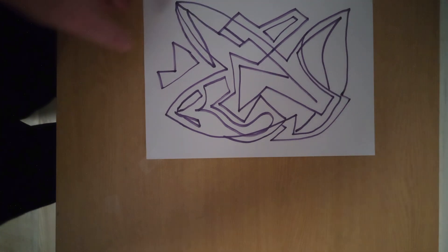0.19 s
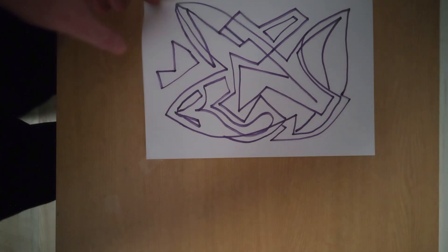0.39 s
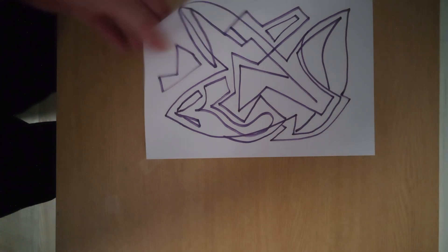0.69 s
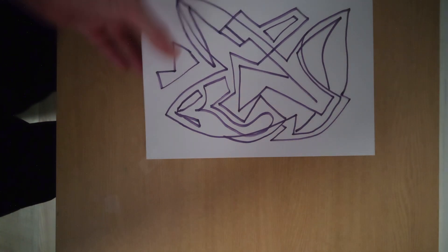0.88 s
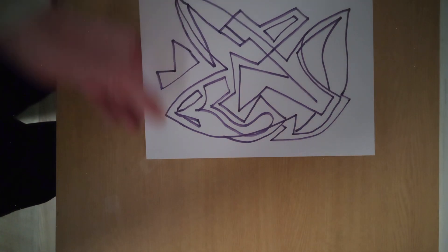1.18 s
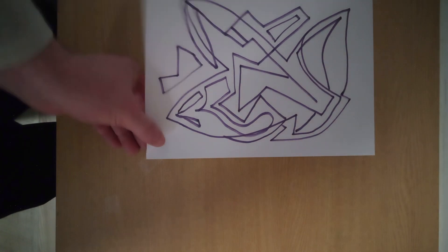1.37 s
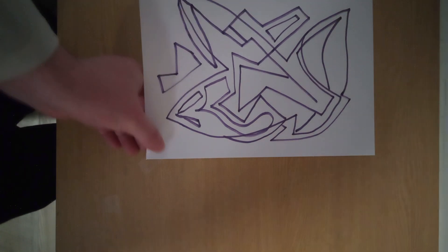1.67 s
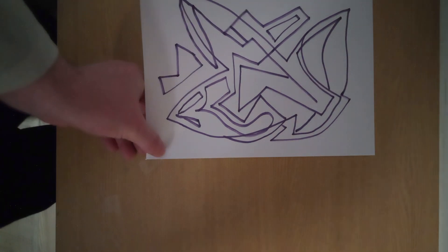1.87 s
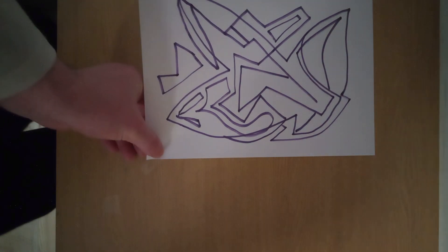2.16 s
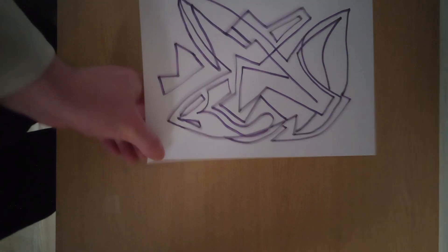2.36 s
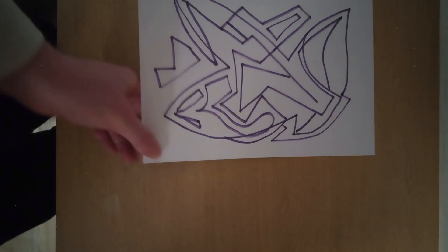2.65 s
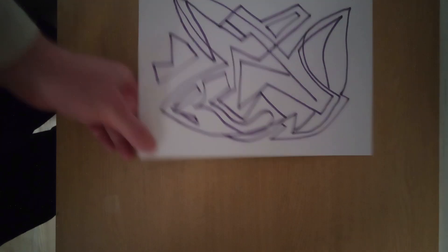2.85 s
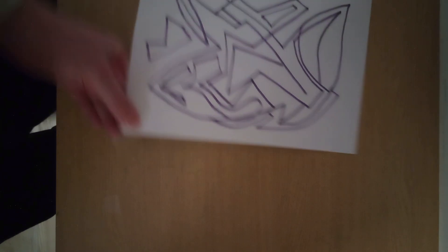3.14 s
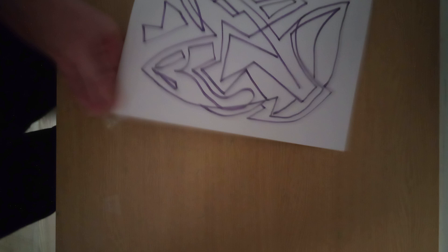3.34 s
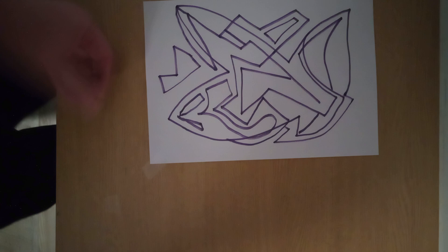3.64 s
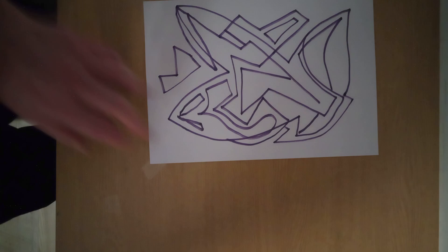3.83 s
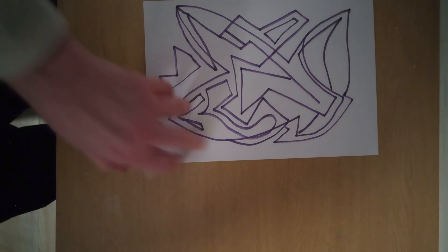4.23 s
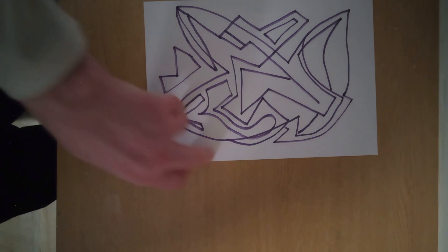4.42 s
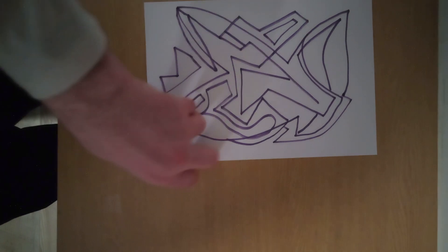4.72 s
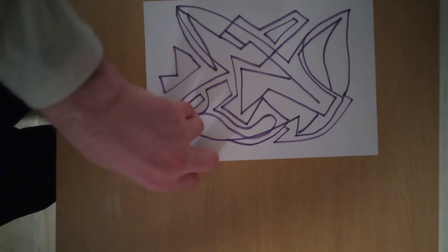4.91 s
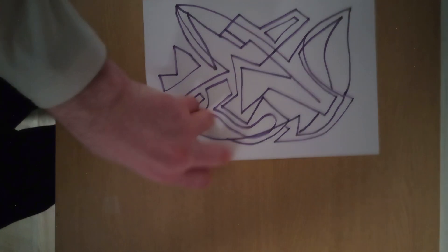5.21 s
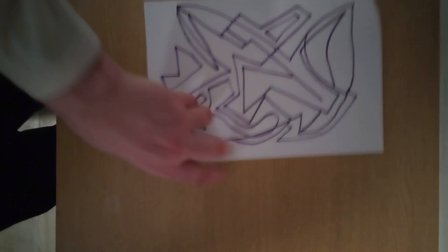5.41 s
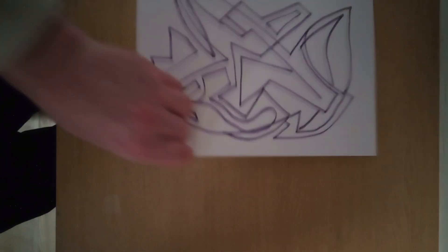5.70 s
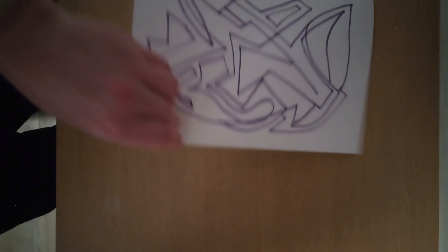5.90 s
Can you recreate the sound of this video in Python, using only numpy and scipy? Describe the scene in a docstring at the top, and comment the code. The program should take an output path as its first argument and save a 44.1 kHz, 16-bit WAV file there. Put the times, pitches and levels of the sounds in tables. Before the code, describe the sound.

Close to the microphone in a quiet room, a sheet of paper is handled on a wooden desktop. Brief swishes and crinkles come in clusters, mixed with light fingertip taps. The rustling then thins out, leaving a few dull, soft bumps, before a crisp paper snap, the loudest sound, leads into a last scrape and flex. A faint low hum and a little hiss lie underneath.

```python
"""Paper handled on a wooden desk

One microphone close to a desk in a quiet room. A hand grips, flexes and slides a sheet of paper:
slipping fibres rub in bursts and creases snap, ringing differently in each shape the sheet is held in.
Fingertips knock the desk top, and low thuds come through the furniture.
A wavering hum and microphone hiss lie below."""
import sys
import numpy as np
from scipy import signal
from scipy.fft import rfft, irfft, next_fast_len
from scipy.io import wavfile
from scipy.ndimage import uniform_filter1d

SR = 44100
rng = np.random.default_rng(int(sys.argv[2]) if len(sys.argv) > 2 else 0)


def wav_record(signal):
    """Record a signal, one row per channel, as 16-bit PCM in the file named by sys.argv[1]."""
    frames = np.transpose(np.atleast_2d(signal))
    bounded = np.clip(frames, -1, 1)
    # unit amplitude maps onto the largest positive 16-bit level
    quanta = np.round(bounded * 32767).astype(np.int16)
    wavfile.write(sys.argv[1], SR, quanta)


N = 266452


def rubbing():
    """Sliding fibres sound in five bands, which share each stroke and partly flutter together."""
    # strokes: peak_s, attack_s, hiss_db, base_fade_db_per_s, length_s,
    # then relative to the hiss: flat_db, bend_db, fizz_db, sizzle_db
    strokes = [ (0.004, 0.03, -68, 119, 0.099, -28, -1, -25, -30),
               (0.13, .025, -75.5, 350, .04, -29, -20, -40, -35),
               (0.23, 0.11, -73.5, 230, 0.085, -14, -23, -21, -18),
               (0.309, 0.0044, -47, 800, 0.027, -21.5, -22, -38, -40),
               (0.34, .02, -65.5, 154, 0.069, -20, -25, -33, -40),
               (0.475, 0.046, -69.5, 20, 0.024, -5, -12, -30, -27),
               (0.507, 0.054, -54, 652, 0.023, -17, -9, -22, -34),
               (0.591, 0.045, -58, 300, 0.037, -21, 2.5, -20, -27),
               (0.703, 0.28, -61, 58, 0.034, -15, -8, -19, -18),
               (0.747, 0.011, -55.5, 175, 0.12, 1, 4.5, -16, -18),
               (0.891, .012, -58.5, 102, .01, -18.5, -3.5, -22, -23),
               (0.916, 0.037, -55, 700, .015, -12.5, -10.5, -23, -14),
               (0.944, 0.04, -48.5, 130, 0.11, 11, 8, -35.5, -33),
               (1.064, .006, -49, 100, 0.015, -24, -6, -24, -30),
               (1.091, .03, -49.5, 160, .15, 3, -2.5, -29.5, -41),
               (1.26, 0.065, -70.5, 38, 0.18, -22, -2.5, -17, -20),
               (1.52, 0.16, -51.5, 192, 0.012, -27, -17, -20, -26),
               (1.545, 0.01, -48.5, 264, 0.15, -7, -14, -26, -9),
               (1.751, 0.033, -72, 11, 0.097, -5.5, -2, -22, -23),
               (1.869, 0.08, -69.5, 152, 0.083, 1, 2, -19, -28),
               (1.994, 0.12, -60, 248, .03, -18, -12, -19.5, -31),
               (2.04, .008, -70.5, 300, 0.02, 5.5, -6, -20, -31),
               (2.072, 0.0066, -59, 241, 0.057, 1.5, 1.5, -27, -24),
               (2.137, 0.031, -77, 200, 0.028, -2, 8, -8, -5),
               (2.196, 0.03, -76.5, 200, 0.019, -4, 0, -2, -1),
               (2.303, 0.0097, -36, 120, 0.017, -27, -11.5, -7, -8),
               (2.333, 0.0081, -48, 62, 0.018, -26, -15, -3, -6),
               (2.354, 0.0094, -36, 257, 0.092, -18.5, -12.5, -18.5, -20),
               (2.447, 0.045, -61, 93, 0.074, -28.5, -9.5, -28.5, -40),
               (2.523, .004, -63.5, 150, 0.016, -26.5, -9.5, -7, -3),
               (2.545, 0.011, -45, 5, 0.033, -15.5, -6, -30, -32),
               (2.587, 0.021, -31.5, 450, 0.039, -3, -3.5, -17, -23),
               (2.638, 0.069, -44.5, 193, 0.16, -7.5, -0.5, -28, -44),
               (2.876, 0.087, -61, 297, 0.083, -14, -14, -33, -40),
               (2.981, 0.09, -76, 95, .01, -1, -10, -15, -12),
               (3.134, 0.014, -43.5, 752, 0.036, -22, -13.5, -19, -5),
               (3.168, 0.023, -71, 113, 0.26, -19, -9, -12, -16),
               (3.432, 0.014, -40.5, 620, .055, -21.5, -7.5, -28.5, -32.5),
               (3.509, 0.042, -59.5, 650, 0.031, -21, -2, -20, -28),
               (3.523, .02, -67.5, 44.5, .14, -23, -9, -30, -25),
               (3.793, .06, -84, 37, 0.055, 5, 0, -25, -18), (4.252, .08, -89, 14, 0.44, 0, 2, -23.5, -17),
               (4.325, .13, -74, 500, 0.033, -22, -17, -21.5, -18),
               (4.391, 0.1, -79, 70, 0.12, -10, -11, -25, -15),
               (5.105, .012, -47, 5, 0.018, -51, -33, -18.5, -33),
               (5.139, 0.027, -56, 152, 0.091, -17.5, -13, -18.5, -22),
               (5.292, 0.086, -61, -3, 0.18, -18.5, -13, -17, -22),
               (5.348, .008, -56, 304, 0.012, -30, -6, -19, -18),
               (5.476, 0.0058, -23.5, 440, 0.043, -12.5, -6, -22.5, -28),
               (5.51, 0.025, -34, 181, 0.08, -13, -8.5, -24.5, -40),
               (5.572, 0.13, -43, 63, 0.16, -26, -3, -50, -54),
               (5.751, .04, -59, 280.5, 0.07, -8, 2, -40, -40),
               (5.704, .02, -63, 202, .015, -17, -12, -16, -25),
               (5.859, 0.02, -77.5, 40, 0.056, 31, 23.5, -39, -36),
               (5.918, 0.07, -79.5, 201, 0.049, 38.5, 27, -43, -38),
               (5.976, 0.057, -88.5, 57.5, .1, 36, 24.5, -28.5, -24)]
    # fading speed of hiss, flat, bend, fizz and sizzle: multiple of the base fade
    fade_shares = [0.96, 0.99, 0.75, 1.2, 1.3]
    # band spectra: frequency_hz, density_db
    edge_hiss = [(2500, -28), (3600, -2), (4500, 3), (6000, 3), (7200, 0), (8000, -44)]
    flat_of_sheet = [(250, -23.5), (600, 0), (900, 1), (1300, 10), (1700, 8), (2300, -54)]
    bend = [(1200, -10.5), (1800, 2.5), (2500, 1.5), (3000, 3.5), (3600, 1.5), (4500, -42.5)]
    fibre_fizz = [(6500, -34), (7500, 3), (8200, -1.5), (9100, -1), (10500, -8), (12200, -15), (13000, -39)]
    top_sizzle = [(11500, -32.5), (13000, -13.5), (14300, -1.5), (15300, 5), (17000, -16.5)]
    rise_db = 28.5   # climb during the attack
    cutoff_db_per_s = 898   # the rubbing's tail is cut off abruptly, as by a noise gate
    gains, t = np.zeros((5, N)), np.arange(-SR // 2, SR // 2) / SR
    for peak_s, attack_s, hiss_db, base_fade, length_s, *relative_db in strokes:
        attack_db = rise_db * np.minimum(t, 0) / max(attack_s, .002)
        cutoff_db = cutoff_db_per_s * np.maximum(t - length_s, 0)
        fade_db = max(base_fade, 0) * np.maximum(t, 0)
        for gain, band_db, share in zip(gains, [0] + relative_db, fade_shares):
            add(gain, peak_s + t[0], amp(hiss_db + band_db + attack_db - cutoff_db - share * fade_db))
    gains = uniform_filter1d(gains, size=130, axis=1)
    pressure_db = 0.85 * drift(rate_hz=50)
    bands = [colour(fibre_slips(per_s=9000, spread_db=0.5), spectrum) * amp(pressure_db + drift(27))
             for spectrum in (edge_hiss, flat_of_sheet, bend, fibre_fizz, top_sizzle)]
    return gains * bands


def fibre_slips(per_s, spread_db):
    """Fibres catch and slip: random clicks of uneven size."""
    sizes = amp(spread_db * np.minimum(rng.exponential(1, N), 4)) * rng.choice([-1, 1], N)
    return sizes * (rng.random(N) < per_s / SR)


def crease_snaps():
    """Each crease gives a cluster of slips around its own pitch, swelling briefly and dying fast."""
    # creases: time_s, level_db, pitch_hz, swell_s, t60_s, relative_fizz_db
    snaps = [(0.308, -37.5, 4440, 0.002, 0.068, -34), (0.4966, -35.5, 2900, 0.0014, 0.11, -38),
             (0.5751, -41, 2540, 0.0016, 0.13, -28), (0.746, -28, 2003, 0.0016, 0.056, -37),
             (0.8964, -40.5, 5890, 0.0032, 0.06, -21.5), (0.9087, -30, 5450, 0.0014, 0.058, -36.5),
             (0.9406, -18.5, 1340, 0.0025, 0.19, -46.5), (0.9586, -18, 1346, 0.0023, 0.12, -55),
             (1.091, -28, 1181, 0.0048, 0.15, -53), (1.546, -29.5, 6050, 0.002, 0.052, -10.5),
             (2.0473, -51, 1400, 0.0018, 0.066, -43), (2.0732, -43.5, 1320, 0.002, 0.032, -40),
             (2.2996, -53, 5160, 0.0022, 0.041, -4), (2.318, -34, 4990, 0.0013, 0.15, -18),
             (2.3507, -33.5, 5200, 0.0015, 0.067, -20), (2.524, -34, 3700, 0.0034, 0.092, -36),
             (2.544, -36, 5860, 0.0024, 0.033, -34), (2.5829, -15, 1864, 0.0012, 0.041, -34),
             (3.1358, -38, 4900, 0.0014, 0.049, -2), (3.4285, -56, 4080, 0.0024, 0.055, -21),
             (3.504, -41, 3680, 0.0028, 0.079, -20), (5.105, -51.5, 4400, 0.003, 0.037, -19),
             (5.3, -52, 1660, 0.002, 0.077, -40), (5.3487, -35.5, 2430, 0.0024, 0.054, -24),
             (5.4786, 2, 3380, 0.0026, 0.033, -44), (5.8536, -34.5, 950, 0.0038, 0.36, -47.5)]
    out, t = np.zeros(N), np.arange(SR // 4) / SR
    for time_s, level_db, hz, swell_s, t60_s, fizz_db in snaps:
        slips = rng.standard_normal(len(t))
        slips *= amp(1.1 * rng.standard_normal(len(t) // 40 + 1).repeat(40)[:len(t)])
        body = rms_one(resonate(resonate(slips, hz, 0.23 * hz), hz, 1.3 * hz))
        body = highpass(body, 0.33 * hz)   # thin paper radiates no bass
        low_fizz = resonate(resonate(slips, 10000, 1500), 11000, 6000)
        high_fizz = resonate(resonate(slips, 14000, 1500), 15200, 2500)
        fizz = amp(fizz_db) * rms_one(low_fizz + .9 * high_fizz)
        envelope = (1 - np.exp(-t / swell_s)) ** 2 * amp(-60 * t / t60_s)
        add(out, time_s - .003, amp(level_db - 10) * envelope * (body + fizz))
    return out


def sheet_modes(excitation):
    """Each movement sounds through the resonances of the sheet's shape, at unchanged energy."""
    # sheet resonances, one list for each shape: pitch_hz, width_hz, lift_db
    shapes = [
        [(4130, 200, 7), (4400, 98, 13), (5800, 120, 10)],
        [(4470, 130, 18), (4930, 100, 12), (5980, 390, 16.5), (6400, 180, 2)],
        [(2960, 480, 9.5), (4700, 90, 6), (6160, 370, 9.5)],
        [(1715, 27, 16), (2750, 300, -3), (3530, 100, 5), (4700, 86, -10), (6650, 180, 7.5)],
        [(1765, 170, 7), (2120, 100, -1), (2570, 100, 7), (4270, 100, 7.5), (6100, 200, 4.5)],
        [(1244, 26.7, -2), (1251, 17, 7), (1577, 60, 2.5), (1904, 80, 11), (2460, 90, 9.5), (4160, 250, 10),
         (6100, 490, 10.5)],
        [(1400, 67, -7), (4450, 86, 6.5), (5350, 38, 12.5), (6250, 83, 5), (6120, 70, 14.5)],
        [(940, 59, 10.5), (1315, 28, 14), (1920, 56, 13.5), (3530, 100, 5), (4230, 50, 13), (5830, 52, 13)],
        [(850, 150, 16.5), (1380, 49, 8), (3360, 100, -1), (4150, 91, 13), (5940, 120, 12), (6150, 86, 7)],
        [(862, 62, 24.5), (3372, 600, 15), (5070, 530, 14.5), (5810, 260, 5.5), (6450, 510, 7)],
        [(3725, 440, 9.5), (5860, 400, 7.5)],
        [(865, 160, 12.5), (1896, 80, 8), (2620, 190, 7), (3850, 410, 10), (4650, 150, -1), (6350, 380, 5.5)],
        [(2700, 68, 6), (2980, 56, 18), (3630, 100, 11), (4820, 120, 10.5), (5330, 100, -5), (6500, 120, -3)],
        [(1590, 280, 18), (3830, 530, 13.5), (4830, 170, 11), (6580, 620, 10)],
        [(586, 18, 21.5), (958, 41, 20), (3990, 270, 14.5), (4310, 250, 15.5), (5960, 290, 11),
         (6420, 190, 14.5)],
        [(1940, 280, 14), (4500, 400, 1)],
        [(1690, 130, 6), (2420, 100, 7), (2746, 94, 16), (4380, 200, 1), (5560, 400, 1.5)],
        [(2030, 320, 7.5), (2700, 73, 8.5), (3036, 190, 15.5), (3580, 83, 12.5), (3980, 200, 12),
         (5370, 270, 7)],
        [(907, 130, 7), (1520, 730, -4.5), (2170, 520, 15.5), (4180, 220, 23.5)],
    ]
    # the grip changes and the sheet takes its next shape: start_s
    regrips = [0.3, 0.465, 0.56, 0.74, 0.885, 1.295, 1.735, 2.035, 2.29, 2.515, 2.57, 2.825, 3.12, 3.41,
               4.145, 5.095, 5.47, 5.84]
    thin_gain_db, thin_width_hz = 11.5, 16
    out = np.zeros(N)
    starts = [round(s * SR) for s in regrips]
    for start, end, modes in zip([0] + starts, starts + [N], shapes):
        piece = np.append(excitation[start:end], np.zeros(SR // 10))
        rung = piece + sum((amp(lift_db) - 1) * resonate(piece, hz, width) for hz, width, lift_db in modes)
        # many thin modes, placed by chance, swell and fade as the paper bends
        t = np.arange(len(piece)) / SR
        for place, rate, phase in rng.random((40, 3)):
            awake = np.maximum(np.sin(2 * np.pi * ((1.4 + 7.5 * rate) * t + phase)), 0)
            rung += amp(thin_gain_db) * resonate(piece * awake, 700 + 9000 * place, thin_width_hz)
        same_energy = np.sqrt(np.sum(piece ** 2) / (np.sum(rung ** 2) + 1e-20))
        add(out, start / SR, same_energy * rung)
    return out


def desk_drag(flat):
    """The flat of the sheet drags on the desk top and wakes its low modes."""
    return amp(6.5) * sum(resonate(flat, hz, width_hz=40) for hz in (263.6, 346, 370, 538))


def fingertip_knocks():
    """A fingertip strikes each desk mode with its own strength; a resting hand shortens the ring."""
    # fingertips on the desk top: start_s, level_db, share_of_free_ring, hardness_db_per_octave
    knocks = [(0.748, -39.5, 0.32, -11.5), (0.923, -38.5, 0.47, 10), (0.937, -29, 0.29, -1),
              (1.118, -45.5, 0.43, -3.5), (1.546, -43, 0.36, -0.5), (2.044, -49.5, 0.48, 4),
              (2.075, -39, 0.22, 0), (2.111, -48, 0.14, -1), (2.165, -64, 0.16, -13),
              (2.305, -43, 0.37, 2.5), (2.354, -52, 0.51, -5), (2.547, -44.5, 0.66, 1),
              (2.588, -42.5, 0.65, -6), (3.134, -63, .3, -8), (3.509, -60, 0.24, 1), (5.479, -43, 0.3, -9),
              (5.952, -38, 0.23, 0)]
    # modes of the desk top: pitch_hz, level_db, free_t60_s
    desk_modes = [(200, -6.5, 0.1), (498.4, -1.5, 0.68), (520.7, 0.5, 0.43), (802, -3.5, 0.33),
                  (955, -10.5, 1), (1143, -20.5, 0.067), (1311, -13, 0.67), (2065, -18.5, 0.17)]
    out, t = np.zeros(N), np.arange(SR // 2) / SR
    for start_s, level_db, ring_share, hardness in knocks:
        ring = np.zeros(len(t))
        for hz, mode_db, t60_s in desk_modes:
            strike_db = mode_db + rng.normal(0, 3.8) + hardness * np.log2(hz / 510)
            ring += amp(strike_db - 60 * t / (t60_s * ring_share)) * np.sin(2 * np.pi * hz * t)
        add(out, start_s, amp(level_db - 7) * (1 - np.exp(-t / 0.0039)) * ring)
    return out


def furniture_thuds():
    """A soft push swells and fades within a few cycles; the furniture rumbles on unevenly."""
    # low thuds: time_s, level_db, pitch_hz, swell_s, relative_rumble_db
    thuds = [(0.185, -64.5, 98, 0.014, -15), (0.477, -43, 96, 0.013, -13), (0.569, -57.5, 96, 0.022, -20),
             (0.742, -44.5, 102, 0.01, -17), (0.923, -44, 103.6, 0.0086, -23),
             (2.546, -62, 114, 0.0075, 1.5), (2.669, -62, 112, .012, 3.5), (3.149, -71.5, 114, 0.012, -11),
             (3.628, -44, 100, 0.011, -14.5), (4.322, -45, 101, 0.011, -14.5),
             (4.511, -48, 106, 0.011, -6.5), (4.739, -57.5, 99.4, 0.01, -17),
             (4.931, -61.5, 100, 0.01, -17.5), (5.023, -48, 102.7, 0.0089, -7.5),
             (5.212, -49, 113.5, 0.013, -12), (5.505, -52.5, 112, 0.012, -32),
             (5.877, -48, 108.8, 0.014, -11.5)]
    out, t = np.zeros(N), np.arange(SR // 2) / SR
    for time_s, level_db, hz, swell_s, rumble_db in thuds:
        rise = t / swell_s
        push = (rise / 2) ** 2 * np.exp(2 - rise) * np.sin(2 * np.pi * hz * t)
        noise = rms_one(resonate(resonate(rng.standard_normal(len(t)), 105, 30), 130, 40))
        rumble = amp(rumble_db - 60 * t / 0.65) * noise * (1 - np.exp(-t / 0.0071))
        add(out, time_s - .012, amp(level_db) * (push + rumble))
    return out


def room_reflections(x, t60_s=0.56, level_db=-11.5):
    """The room returns a diffuse, dying tail, duller than the direct sound."""
    t = np.arange(SR // 2) / SR
    tail = rng.standard_normal(len(t)) * amp(-60 * t / t60_s) * (t > .004)
    tail = signal.lfilter([.6], [1, -.4], tail)
    return amp(level_db) * signal.fftconvolve(x, tail / np.sqrt(np.sum(tail ** 2)))[:N]


def hum(base_db=-76.5, waver_db=3.5):
    """Noise in a few narrow resonances makes a low hum that wavers and briefly swells."""
    # hum resonances: pitch_hz, width_hz, relative_db
    resonances = [(207.1, 8.3, -2.5), (231, 42, -10), (99.8, 19, -14.5), (346.5, 52, -13.5)]
    # swells of the hum: centre_s, level_db
    swells = [(0.52, -63), (0.76, -61.5), (1.05, -65), (1.55, -76), (1.83, -68.5), (2.07, -78), (2.62, -56),
              (3.46, -64.5), (3.68, -72), (3.88, -61), (4.07, -72), (4.63, -64), (4.881, -66),
              (5.298, -62.5), (5.42, -61), (5.52, -59.5), (5.61, -64), (5.75, -68), (5.96, -68.5)]
    slope_db_per_s, half_hold_s = 350, 0.021
    t = np.arange(N) / SR
    drone = sum(amp(db) * rms_one(resonate(resonate(rng.standard_normal(N), hz, width), hz, width))
                for hz, width, db in resonances)
    waver = amp(base_db + waver_db * drift(rate_hz=3.6))
    swelling = sum(amp(db - slope_db_per_s * np.maximum(np.abs(t - centre_s) - half_hold_s, 0))
                   for centre_s, db in swells)
    return (waver + swelling) * drone


def noise_floor(level_db=-71):
    """Steady room tone and microphone hiss."""
    # room and microphone noise: frequency_hz, density_db
    spectrum = [(15, -80), (25, -54.5), (80, -22.5), (170, -15.5), (212, -6.5), (317, -27.5), (373, -20),
                (489, -18.5), (754, -27.5), (1260, -29), (5880, -34), (7000, -36), (8360, -52),
                (13000, -49.5), (15000, -41), (17000, -29.5)]
    return amp(level_db) * colour(rng.standard_normal(N), spectrum)


def amp(db):
    """dB to gain."""
    return 10 ** (np.asarray(db) / 20)


def rms_one(x):
    """Scale to rms 1."""
    return x / np.sqrt(np.mean(x ** 2) + 1e-20)


def colour(x, spectrum):
    """Shape by a spectrum drawn on a log-frequency axis; rms 1."""
    hz, db = np.transpose(spectrum)
    size = next_fast_len(N)
    grid_hz = np.maximum(np.fft.rfftfreq(size, 1 / SR), 1)
    gain = amp(np.interp(np.log(grid_hz), np.log(hz), db))
    return rms_one(irfft(rfft(x, size) * gain, size)[:N])


def drift(rate_hz):
    """Slow random wander; rms 1."""
    r = np.exp(-2 * np.pi * rate_hz / SR)
    return rms_one(signal.lfilter([1], [1, -2 * r, r * r], rng.standard_normal(N + SR))[SR:])


def resonate(x, hz, width_hz):
    """One resonance, gain 1 at its peak."""
    r = np.exp(-np.pi * width_hz / SR)
    feedback = [1, -2 * r * np.cos(2 * np.pi * hz / SR), r * r]
    return signal.lfilter([(1 - r * r) / 2, 0, (r * r - 1) / 2], feedback, x)


def highpass(x, hz):
    """Roll off below hz at 12 dB per octave."""
    return signal.sosfilt(signal.butter(2, hz, "high", fs=SR, output="sos"), x)


def add(out, start_s, sound):
    """Mix a sound in at start_s."""
    i = round(start_s * SR)
    sound, i = sound[max(-i, 0):], max(i, 0)
    out[i:i + len(sound)] += sound[:N - i]


def scene():
    """Paper, desk and room as they reach the microphone, in mono."""
    creases, knocks = crease_snaps(), fingertip_knocks()
    hiss, flat, bend, fizz, sizzle = rubbing()
    # the lower rubbing rings through the sheet; the high fizz and sizzle are added directly and stay bright
    paper = sheet_modes(hiss + flat + bend + creases + room_reflections(creases)) + fizz + sizzle
    desk = desk_drag(flat) + knocks + room_reflections(knocks) + furniture_thuds()
    return (paper + desk + hum() + noise_floor())[None]


def record(dry):
    """The microphone drops the deepest bass; the top is cut steeply."""
    low_cut_hz, high_cut_hz = 45, 15800
    top_cut = signal.ellip(12, .5, 70, high_cut_hz, fs=SR, output="sos")
    return signal.sosfilt(top_cut, highpass(dry, low_cut_hz))


dry = scene()
out = record(dry)
wav_record(out)
```